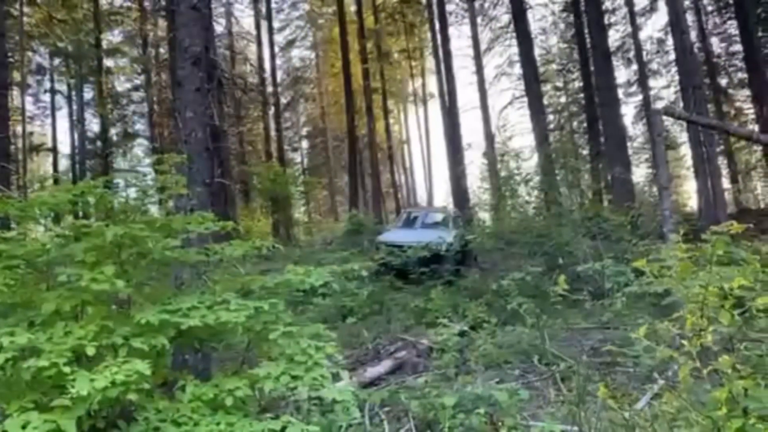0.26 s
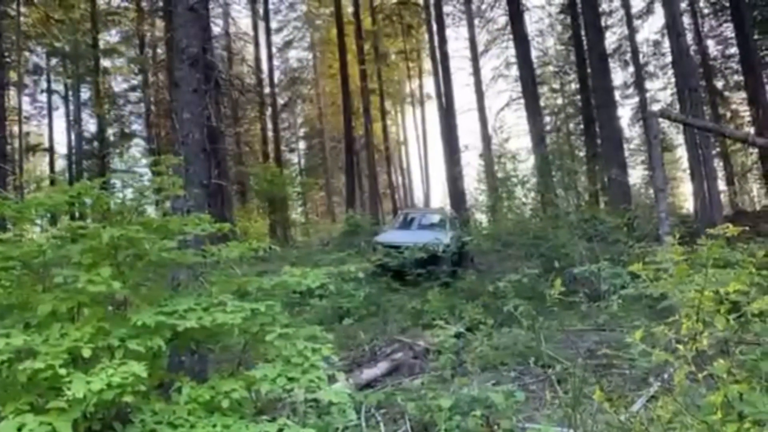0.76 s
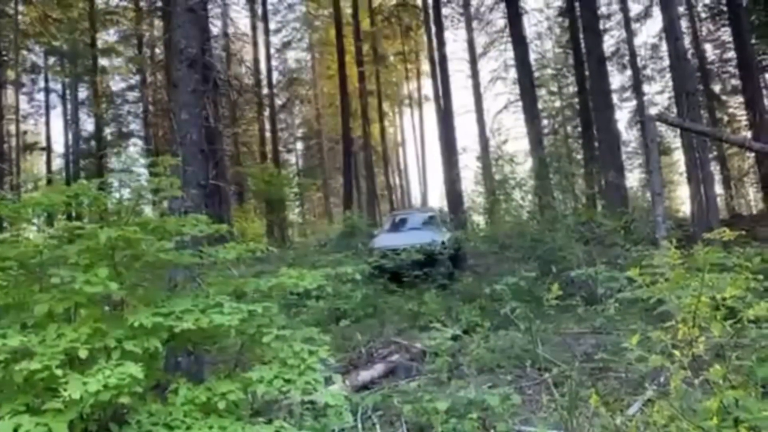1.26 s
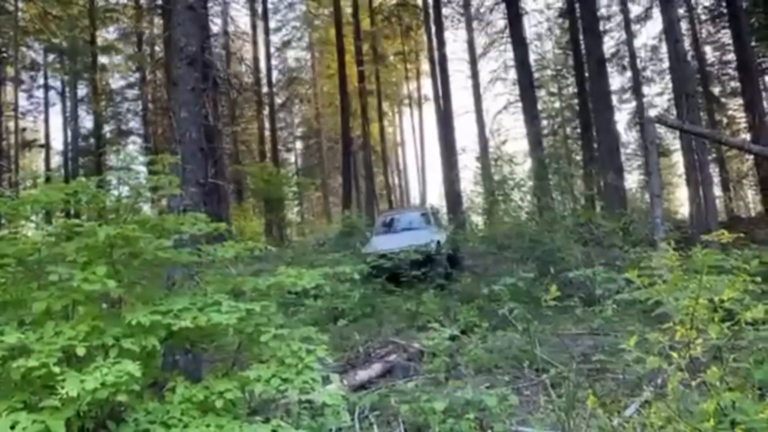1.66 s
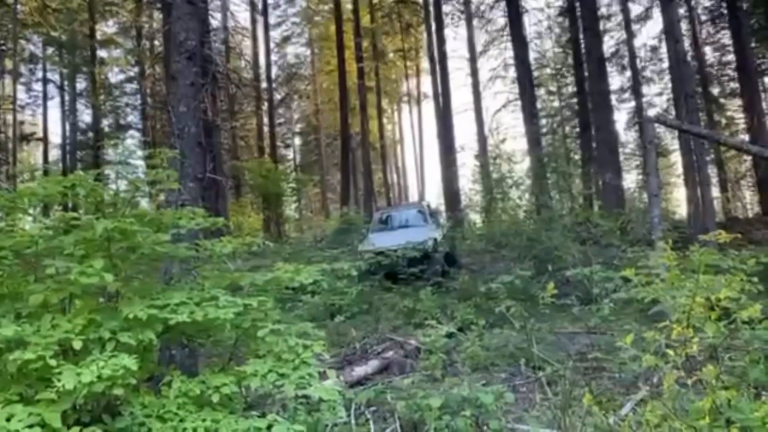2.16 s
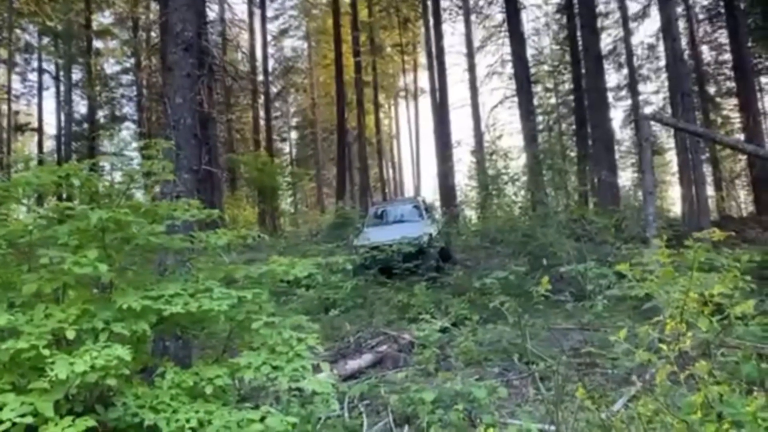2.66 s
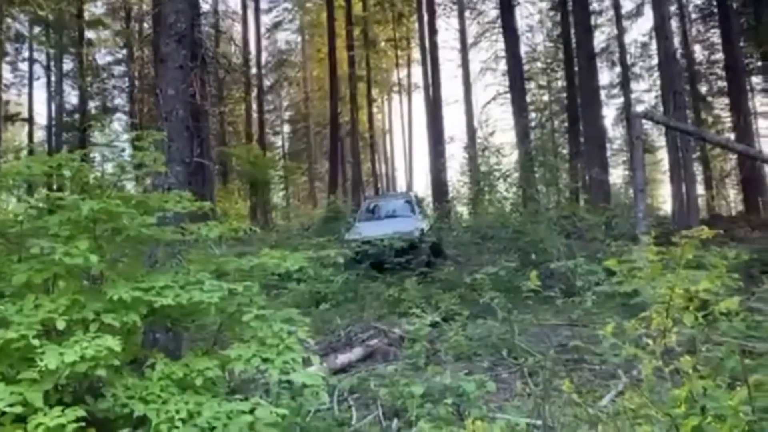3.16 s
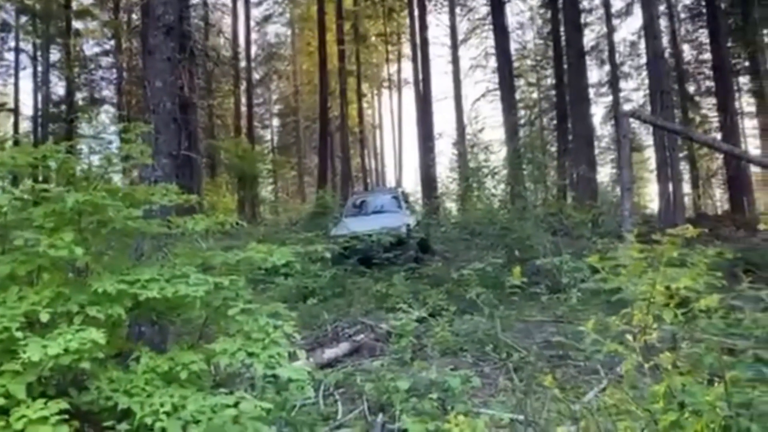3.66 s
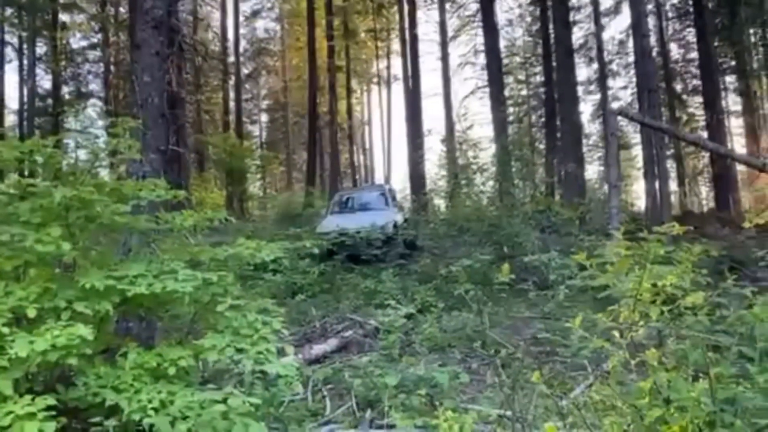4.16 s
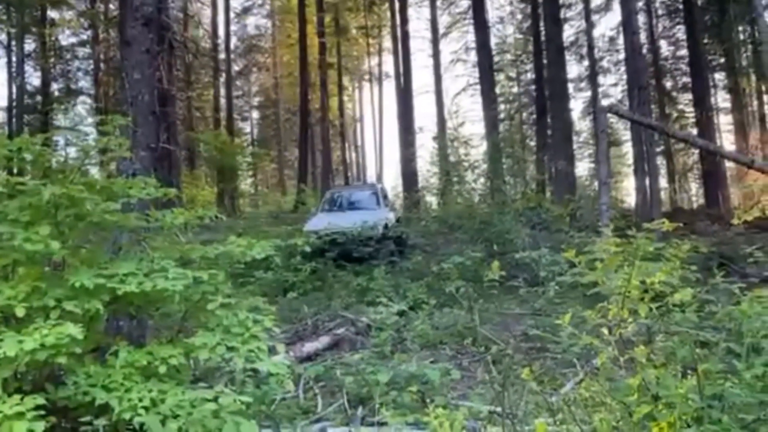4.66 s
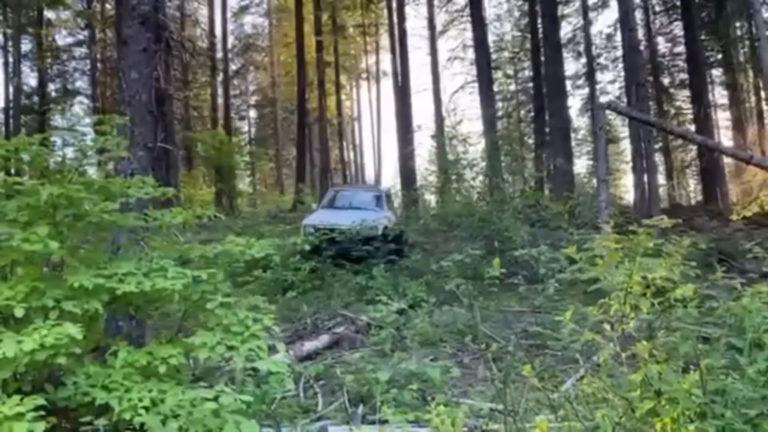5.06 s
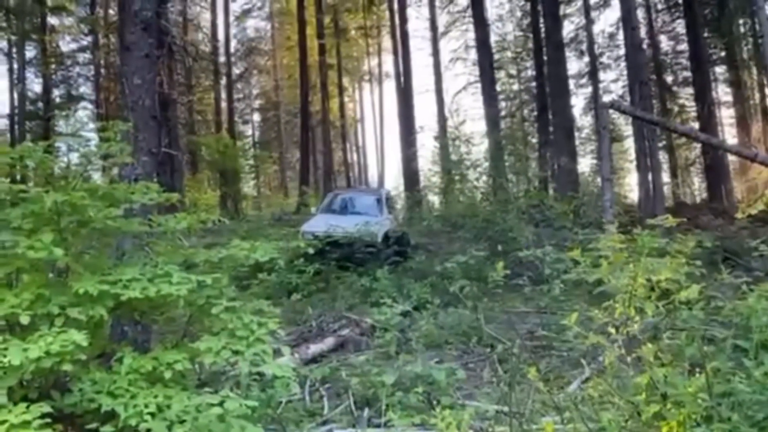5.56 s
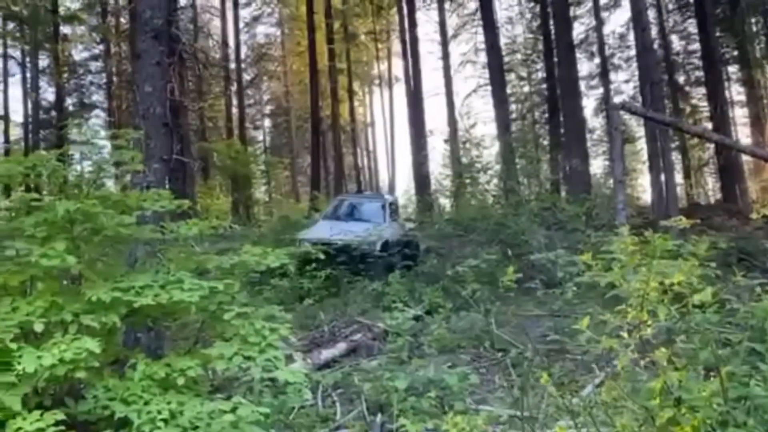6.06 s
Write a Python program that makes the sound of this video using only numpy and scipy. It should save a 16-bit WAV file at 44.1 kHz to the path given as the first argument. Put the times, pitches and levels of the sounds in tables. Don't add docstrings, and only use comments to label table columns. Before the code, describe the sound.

From 0 s a deep, smooth exhaust note near 64 Hz holds steady, beating against a second, lower engine that wavers up and down. Soft intake roar and fan noise sit above, with thin brush crackle. Around 0.9-1.8 s the brush thickens, small twigs tick and brief high squeaks chirp on paint. At 2.3 s the first engine jumps into a short surge, peaking near 2.6 s amid a cluster of snaps, then sags. A second, higher surge comes at 3.6-3.9 s with hard limb cracks, falling by 4.3 s. The third and longest climbs from 4.3 s and holds until about 5.7 s, barking and hissing, with dense crackle and tearing branches, while the second engine sinks to idle. Near 5.8 s a rough lurch swells with a sharp snap; revs drop and last branches break until 6.3 s. Close, dry woodland sound, gradually nearing.

```python
import sys
import numpy as np
from scipy import signal
from scipy.fft import rfft, irfft
from scipy.io import wavfile
from scipy.ndimage import uniform_filter1d

SR = 44100
rng = np.random.default_rng(int(sys.argv[2]) if len(sys.argv) > 2 else 0)


def invert_db(x):
    u = np.asarray(x, float) / 20
    return 10 ** u


def persist_wave(psi):
    counts = np.round(np.clip(psi, -1, 1) * 32767).astype(np.int16)
    wavfile.write(sys.argv[1], SR, np.atleast_2d(counts).T)


N = 277461


def curve(table):
    s, *columns = np.transpose(table)
    return [np.interp(np.arange(N) / SR, s, c) for c in columns]


def colour_db(points, hz):
    f, db = np.transpose(points)
    return np.interp(np.log(hz + 1), np.log(f), db, left=-90, right=-90)


def shape(x, points):
    gain = invert_db(colour_db(points, np.fft.rfftfreq(len(x), 1 / SR)))
    y = irfft(rfft(x) * gain, len(x))
    return y / np.sqrt(np.mean(y ** 2))


def walk(rate):
    k = int(SR / rate)
    held = np.repeat(rng.standard_normal(N // k + 1), k)
    return 1.44 * uniform_filter1d(uniform_filter1d(held, k), k)[:N]


def tone(angle, db):
    return np.sqrt(2) * invert_db(db) * np.cos(angle)


def upper_orders(angle, hz, db, pipe, orders, wobble_db, wobble_rad):
    out = 0
    for k in orders:
        flutter = wobble_db * np.sqrt(k) * walk(16)
        blur = rng.uniform(0, 2 * np.pi) + wobble_rad * k * walk(30)
        out = out + tone(k * angle + blur, db + colour_db(pipe, k * hz) + flutter)
    return out


# (down [s], up [s])
PEDAL_PRESSES = [
    (2.34, 2.51),
    (3.57, 3.78),
    (4.31, 5.9),
]


def throttle():
    t = np.arange(N) / SR
    press_s, lift_s = 0.097, 0.1
    opening = 0
    for down, up in PEDAL_PRESSES:
        opening = opening + np.clip((t - down) / press_s, 0, 1) * np.clip(1 - (t - up) / lift_s, 0, 1)
    return opening


# (time [s], firing rate [Hz], exhaust level with the throttle shut [dB])
LEAD_REVS = [(0, 64.12, -29.5), (2.35, 63.47, -28), (2.49, 80.7, -16.5), (2.6, 88.06, -12.5),
             (2.8, 79.96, -19), (2.95, 78.1, -19), (3.15, 69.55, -21), (3.59, 69.07, -22.5),
             (3.82, 96.56, -13.5), (3.95, 91.27, -13), (4.3, 60.2, -24), (4.55, 72.47, -20.5),
             (4.83, 81.44, -14), (5.17, 84.16, -14), (5.47, 79.7, -15.5), (5.74, 65.33, -18.5),
             (5.9, 68.16, -20.5), (6.1, 59.5, -22)]


def lead_motion():
    hz, shut_db = curve(LEAD_REVS)
    return uniform_filter1d(hz, SR // 14, mode="nearest"), shut_db


# (time [s], firing order [dB], second order [dB])
WHEEL_JOLTS = [(2.6, -3, 1.5), (2.87, 0.5, -21), (3.15, -0.5, -7), (3.6, 0, 5.5), (3.71, 3, 0.5),
               (4.14, 6, -5), (4.28, -1, 6), (5.52, 1, 1), (5.67, -6.5, -6), (5.77, 1.5, -1),
               (6.06, -9, -0.5)]


def jolts():
    t = np.arange(N) / SR
    jolt_s = 0.037
    return sum(np.outer(db, np.exp(-((t - s) / jolt_s) ** 2)) for s, *db in WHEEL_JOLTS)


# (frequency [Hz], level [dB])
LEAD_TAILPIPE = [(110, -26.5), (128, -28), (140, -24.5), (152, -24), (165, -29), (178, -32.5), (195, -42)]
# (multiple of the firing order, level under it [dB])
UNEVEN_ORDERS = [(0.499, -38), (.75, -32), (1.25, -22.5), (1.5, -31.5), (1.748, -29), (2.25, -37),
                 (2.499, -46)]
# (frequency [Hz], level [dB])
LEAD_PIPE = [(150, 2), (250, -11), (330, -7), (415, -1.5), (500, -11), (620, -13), (800, -9), (1000, -26)]


def lead_car(hz, first_db, bark_db, pedal, octave_db):
    angle = 2 * np.pi * np.cumsum(hz) / SR
    note = tone(angle - 1.7, first_db + 0.5 * walk(25))
    lumpy_db = 1.5 * (1.3 - pedal) * walk(21.98)
    note += tone(2 * angle - 2.0, colour_db(LEAD_TAILPIPE, 2 * hz) + lumpy_db + octave_db)
    side_db = -13.5 + 0.12 * (first_db + 21.5) - 0.3 * (bark_db + 39.5)
    for order, db in UNEVEN_ORDERS:
        drift = 0.5 * walk(6)
        note += tone(order * angle + drift, side_db + db + 2.8 * walk(9.8))
    bark = upper_orders(angle, hz, bark_db, LEAD_PIPE, range(3, 12), wobble_db=0.7, wobble_rad=0.05)
    return note + bark, angle


# (time [s], firing rate [Hz], exhaust level [dB], load [dB])
CHASE_REVS = [(0, 28.18, 4.5, -26.5), (.29, 40.56, 1.5, 0), (.41, 46.2, -7, -11), (.73, 48.37, -6.5, -6.5),
              (.87, 40.91, -2, -3.5), (1.05, 43.6, -3, 4), (1.26, 27.85, 11.5, -22.5),
              (1.37, 29.72, 4.5, -12), (1.5, 41.34, -2, 4.5), (1.7, 53.83, -4.5, -4), (1.9, 56.11, -1, -14),
              (2.4, 51.98, -1, -12.5), (2.92, 45.6, -14, -2.5), (3.15, 50.6, -3, -8), (3.8, 33, -23, -14),
              (4.17, 34.92, -6, -13), (4.27, 44.93, 8, -8.5), (4.36, 33.97, -20, -10.5)]


def chase_motion():
    return curve(CHASE_REVS)


# (frequency [Hz], level [dB])
CHASE_MUFFLER = [(25, -58), (36, -48), (43, -28.5), (56, -15.5), (85, -22.5), (100, -18), (128, -22.5),
                 (175, -31)]
# (level [dB], share of the load [ratio])
STRONG_ORDERS = [
    (-1.5, .01),
    (-0.5, 0.57),
    (-3.5, 0.98),
]
# (frequency [Hz], level [dB])
CHASE_SILENCER = [(100, 16), (165, -3.5), (205, 1.5), (240, -3), (275, -28)]


def chase_car(hz, level_db, load_db):
    angle = 2 * np.pi * np.cumsum(hz) / SR
    start_rad = (-2.2, -0.6, -2.1)
    note = 0
    for k, (db, share) in enumerate(STRONG_ORDERS):
        order_db = level_db + colour_db(CHASE_MUFFLER, (k + 1) * hz) + db + share * load_db
        note = note + tone((k + 1) * angle + start_rad[k], order_db + 0.5 * walk(20))
    upper_db = -34 + 0.88 * load_db + 0.13 * level_db
    upper = upper_orders(angle, hz, upper_db, CHASE_SILENCER, range(4, 9), wobble_db=0.7, wobble_rad=0.04)
    return note + upper, angle


def roar_level(lead_hz, chase_hz, pedal, load_db):
    t = np.arange(N) / SR
    lurch = np.exp(-((t - 5.82) / 0.072) ** 2)
    lead_db = -47 + 0.18 * (lead_hz - 63.7)
    lead_db = lead_db + 3.5 * uniform_filter1d(pedal, SR // 4) + 6.5 * lurch
    chase_db = -46.5 + 0.36 * (chase_hz - 31.2) + 0.14 * load_db
    nearing_db = 0.5 * t
    return 10 * np.log10(invert_db(lead_db) ** 2 + invert_db(chase_db) ** 2) + nearing_db


# (frequency [Hz], level [dB])
ROAR_OUTLINE = [(40, 8), (110, 6), (190, -1.5), (290, -8.5), (420, -7.5), (560, -3.5), (780, -4.5),
                (1000, -12.5), (1500, -26), (2100, -35), (3000, -36)]


def roar(lead_angle, chase_angle, db):
    lead = (1 + 0.16 * np.cos(lead_angle)) * rng.standard_normal(N)
    chase = 0.31 * (1 + 1.5 * np.cos(chase_angle)) * rng.standard_normal(N)
    return shape(lead + chase, ROAR_OUTLINE) * invert_db(db + 6.0 + 0.33 * walk(16))


# (frequency [Hz], level [dB])
FAN_SHROUD = [(1100, -2), (1350, 1.5), (1550, -3.5), (1750, 0.5), (2050, -5), (2350, 0.5), (2650, -12),
              (4200, -11), (5200, -13)]
# (frequency [Hz], level [dB])
INTAKE_HISS = [(5500, -48), (5950, 7), (7000, 4.5), (7800, -2), (8700, -25)]


def air(roar_db, bark_db, angle):
    fan = shape(rng.standard_normal(N), FAN_SHROUD) * invert_db(-50 + 1.05 * (roar_db + 42.0) + walk(14))
    turn = angle / (4 * np.pi) % 1
    tick = 1.6 * np.exp(-turn / 0.14) * invert_db(3 * walk(30))
    gulps = rng.standard_normal(N) * (0.45 + tick)
    return fan + shape(gulps, INTAKE_HISS) * invert_db(-50.5 + bark_db + 35.5)


# (multiple of the ring, level [dB])
STICK_MODES = [
    (1.001, 4),
    (1.9, -18.5),
    (2.7, -24),
]
# (time [s], peak [dB], ring [Hz], treble over the peak [dB], length [ms])
TWIG_SNAPS = [(0.24, -37.5, 2820, 8, 0.8), (1.1997, -29, 4530, -5, 0.64), (1.5544, -27.5, 4430, 3.5, 0.89),
              (1.732, -26, 4240, 7, 1), (2.4892, -22.5, 3350, -26, 0.58), (2.529, -22.5, 4614, -19, 0.44),
              (2.5485, -30, 4900, -20, 0.62), (2.5618, -19.5, 4670, -15, 0.27),
              (2.6921, -28, 3490, -21, 0.22), (2.7413, -29, 3900, -24, 0.77), (2.7621, -33, 4250, -16, 0.6),
              (2.7921, -20.5, 3770, -5, 0.79), (2.815, -34, 4120, -21, 0.87), (2.835, -24, 3840, -5, 0.69),
              (2.85, -20.5, 4570, -12, 0.37), (3.878, -23, 3980, -31, 0.92), (4.336, -24.5, 4073, -2, 1),
              (4.441, -21.5, 3660, -23, 0.4), (4.464, -28, 4600, -21, 0.73), (4.6455, -23, 3470, -11, 0.65),
              (4.7122, -24.5, 4040, -22, 0.72), (5.4265, -21.5, 4076, -3, 0.8), (6.2661, -45, 2982, -31, 1)]
DRY_STALKS = [(0.9167, -30.5, 6200, 0, 0.83), (1.1566, -28.5, 6244, -9, 0.97),
              (3.5324, -36, 7360, -1, 0.59), (3.5516, -27, 7520, -7, 0.47), (2.4132, -23.5, 6190, -21, 0.8),
              (5.0394, -17, 6140, -20, 0.57), (5.8153, -12.5, 5980, -28, 0.36)]
MORE_BREAKS = [(0.324, -41, 1500, -30, .9), (1.479, -34, 1500, -30, .9), (1.958, -32, 1520, -24, 0.87),
               (2.386, -24.5, 1810, -2, 0.68), (2.4694, -21.5, 1740, -10, 1),
               (2.9215, -17.5, 1900, 0, 0.23), (3.416, -39, 1870, -10, 0.71), (3.568, -35, 2000, -15, 0.81),
               (3.3987, -13, 1786, -34, 0.5), (3.575, -13, 2040, -17, 0.7), (4.612, -25, 1940, -21, 0.62),
               (4.6213, -20, 1810, -46, 0.42), (4.638, -18.5, 1770, -21, 0.64),
               (4.8249, -15, 1420, -22, 0.91), (5.1355, -22, 2450, -32, 0.96),
               (0.834, -31, 2820, -22, 0.93), (1.4035, -29, 2904, -15, 0.8), (3.1206, -18, 3040, -40, 0.9),
               (3.5752, -14.5, 4240, -9, 0.6)]
TEARING_BRANCHES = [(3.635, -27, 6150, -2, 2.4), (3.721, -23.5, 2330, 7.5, 2.3), (4.367, -19, 4210, -4, 2),
                    (4.7247, -20.5, 4010, -23, 1.65), (4.8204, -14.5, 3470, -8, 1.7),
                    (5.016, -27, 2620, 6, 1.8), (5.0906, -36, 2416, 9, 2.5), (5.354, -25, 4024, 1, 2.05),
                    (5.6227, -17, 4470, 4.5, 4.4), (5.6425, -19.5, 4440, -22, 7.4),
                    (5.9462, -22.5, 3567, -23, 4.6), (5.9605, -17.5, 4580, -24, 2.5),
                    (6.001, -27, 4884, 9, 2.9), (6.112, -31, 3980, -6, 2), (6.1207, -24, 6240, -2, 1.6)]


def snaps():
    size = 2048
    out, t = np.zeros(N + size), np.arange(size) / SR
    wide = signal.butter(2, [1300, 7200], "bandpass", fs=SR, output="sos")
    high = signal.butter(2, 10000, "highpass", fs=SR, output="sos")
    for s, db, hz, top_db, ms in TWIG_SNAPS + DRY_STALKS + MORE_BREAKS + TEARING_BRANCHES:
        splinter, crack, hiss = rng.standard_normal((3, size))
        decay = np.exp(-1000 * t / max(ms, 0.2) / 1.6)
        fall = (1 - np.exp(-t / 0.00029)) ** 2 * decay
        fall = fall / fall.max()
        ring = 0
        for k, mode_db in STICK_MODES:
            if k * hz < 8000 or k == 1:
                push = (4.0 * splinter + np.sin(2 * np.pi * k * hz * t)) * fall
                mode = signal.iirpeak(k * hz, 2.8 * k, fs=SR)
                ring = ring + invert_db(mode_db) * signal.lfilter(*mode, push)
        burst = signal.sosfilt(wide, crack * fall)
        spit = signal.sosfilt(high, hiss * fall ** 2)
        body = ring / np.abs(ring).max() + 0.57 * burst / np.abs(burst).max()
        i = int(s * SR)
        out[i:i + size] += invert_db(db - 1.5) * (body + invert_db(top_db + 0.5) * spit / np.abs(spit).max())
    return out[:N]


# (time [s], level [dB])
BRUSH_THICKNESS = [(0, -52), (.5, -54.5), (.9, -46), (1.3, -45.5), (1.5, -46.5), (2.2, -46.5), (2.65, -45),
                   (2.9, -51), (3.5, -51.5), (3.87, -46), (4.25, -51), (4.6, -46), (5.68, -46),
                   (5.82, -43.5), (5.95, -46.5), (6.29, -46.5)]


def brush_level(pedal):
    return curve(BRUSH_THICKNESS)[0] + 8 * pedal


def crackle(rate, spread_db, bed_db, smear_s):
    sizes = (rng.random(N) < rate / SR) * invert_db(spread_db * np.minimum(rng.exponential(size=N), 4))
    envelope = signal.lfilter([1], [1, -np.exp(-1 / (smear_s * SR))], sizes)
    return rng.standard_normal(N) * (envelope / np.sqrt(np.mean(envelope ** 2)) + invert_db(bed_db))


# (frequency [Hz], level [dB])
STEM_OUTLINE = [(600, 17), (1200, 6), (2050, -10.5), (2400, 2), (2900, 0.5), (4100, 3.5), (5500, -0.5),
                (6300, -1), (7800, -4.5), (9000, -27)]
# (frequency [Hz], level [dB])
LEAF_OUTLINE = [(7000, -36), (9300, -15), (11000, -3.5), (12500, -12.5), (14800, -14), (16500, -11)]


def brush(db, leaves_db):
    breaks = crackle(rate=280.0, spread_db=7.5, bed_db=4.0, smear_s=0.0027)
    rustle = crackle(rate=110.0, spread_db=6.5, bed_db=1.0, smear_s=0.0015)
    stems = shape(breaks, STEM_OUTLINE) * invert_db(db + 1.5 + 0.22 * walk(17))
    leaves = shape(0.93 * breaks + rustle, LEAF_OUTLINE) * invert_db(leaves_db + 2.0 + 1.2 * walk(6.8))
    return stems + leaves


# (time [s], length [s], start [Hz], end [Hz], level [dB])
PAINT_SQUEAKS = [
    (0.908, 0.042, 6200, 6430, -47),
    (0.94, .05, 6740, 6900, -51),
    (1.04, 0.084, 4600, 4550, -57),
    (1.192, 0.097, 4500, 4570, -53),
    (1.418, .03, 6560, 6560, -51),
    (1.494, 0.055, 6100, 5700, -48),
    (1.732, 0.035, 4900, 4500, -48),
    (2.342, 0.026, 5935, 6160, -52),
]


def squeaks(blur_hz):
    out = np.zeros(N)
    for s, length, hz0, hz1, db in PAINT_SQUEAKS:
        u = np.arange(int(length * SR)) / (length * SR)
        angle = 2 * np.pi * length * (hz0 * u + (hz1 - hz0) * u ** 2 / 2)
        i = int(s * SR)
        out[i:i + len(u)] += np.sin(np.pi * u) * tone(angle, db)
    return out * walk(blur_hz)


def trunks(x, t60_s, wet_db):
    t = np.arange(int(0.5 * SR)) / SR
    dull = signal.lfilter([1], [1, -0.6], rng.standard_normal(len(t)))
    tail = dull * np.exp(-np.log(1000) * t / t60_s) * (t > 0.006)
    return x + invert_db(wet_db) * signal.fftconvolve(x, tail / np.sqrt(np.sum(tail ** 2)))[:N]


def scene():
    pedal = throttle()
    jolt_db, octave_db = jolts()
    lead_hz, shut_db = lead_motion()
    chase_hz, level_db, load_db = chase_motion()
    bark_db = -51.5 + pedal * (10.5 + 0.41 * (lead_hz - 62))
    first_db = shut_db + 5 * pedal + jolt_db
    lead, lead_angle = lead_car(lead_hz, first_db, bark_db, pedal, octave_db)
    chase, chase_angle = chase_car(chase_hz, level_db, load_db)
    roar_db = roar_level(lead_hz, chase_hz, pedal, load_db)
    engines = lead + chase + roar(lead_angle, chase_angle, roar_db) + air(roar_db, bark_db, lead_angle)
    brush_db = brush_level(pedal)
    leaves_db = -53 + 1.06 * (brush_db + 38)
    wood = brush(brush_db, leaves_db) + snaps() + squeaks(blur_hz=630)
    return (engines + trunks(wood, t60_s=0.06, wet_db=-16.0))[None]


def band_limit(x):
    return signal.sosfilt(signal.butter(12, 16820, fs=SR, output="sos"), x)


# (low [Hz], high [Hz])
TREBLE_NOTCHES = [
    (8700, 9250),
    (12900, 13750),
]


def record(dry):
    for low_hz, high_hz in TREBLE_NOTCHES:
        notch = signal.butter(4, [low_hz, high_hz], "bandstop", fs=SR, output="sos")
        dry = signal.sosfilt(notch, dry)
    dry = dry - 0.18 * signal.lfilter(*signal.iirpeak(5550, 6.0, fs=SR), dry)
    mix = signal.sosfilt(signal.ellip(8, 0.2, 30, 15750, fs=SR, output="sos"), dry)
    return band_limit(mix)


dry = scene()
out = record(dry)
persist_wave(out)
```